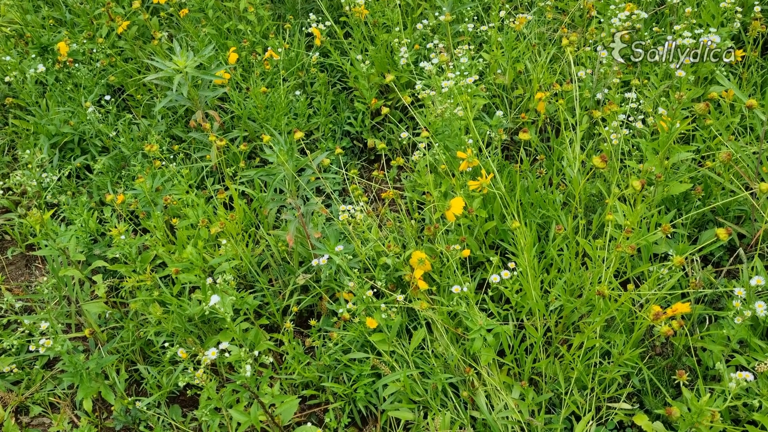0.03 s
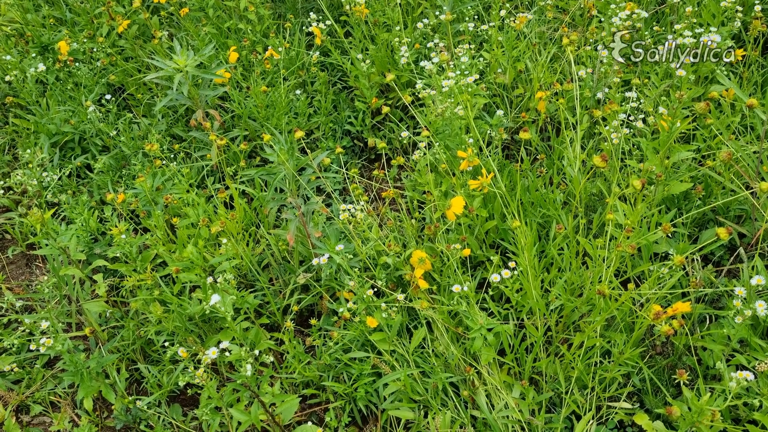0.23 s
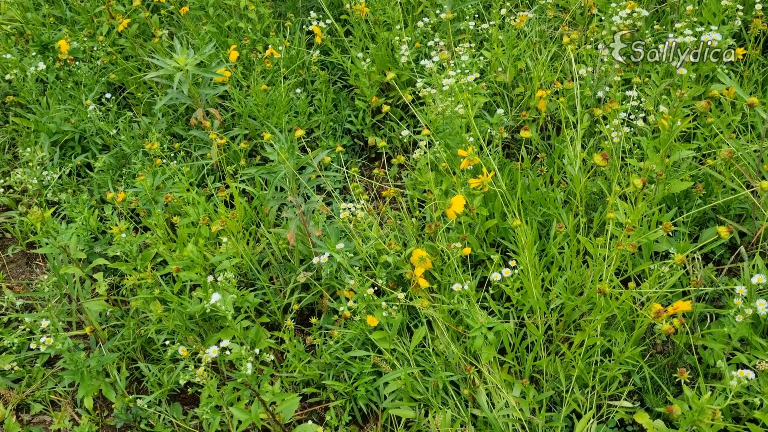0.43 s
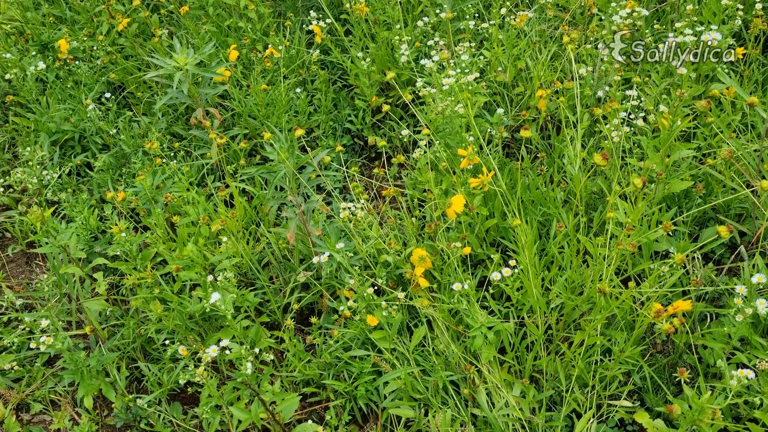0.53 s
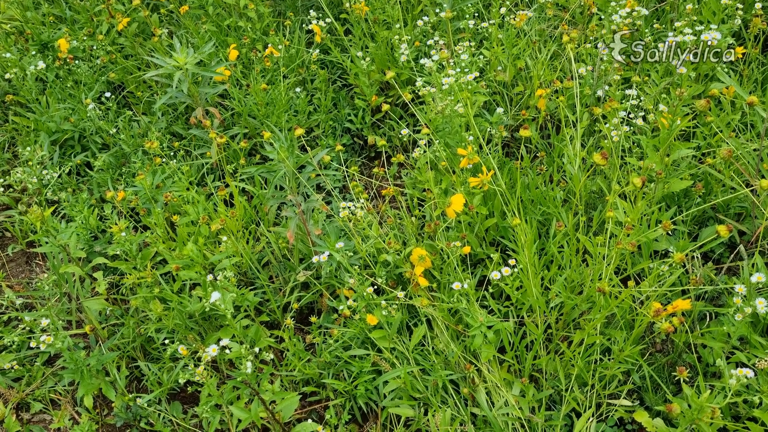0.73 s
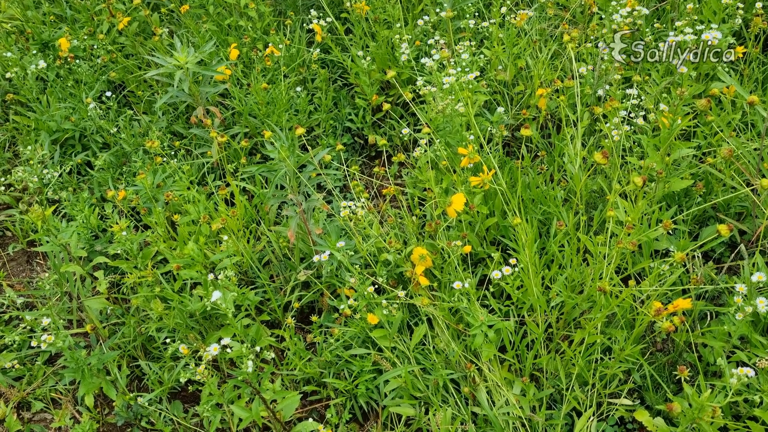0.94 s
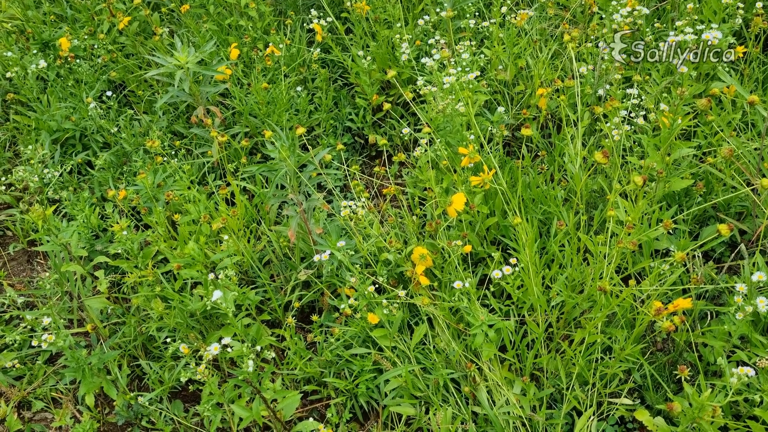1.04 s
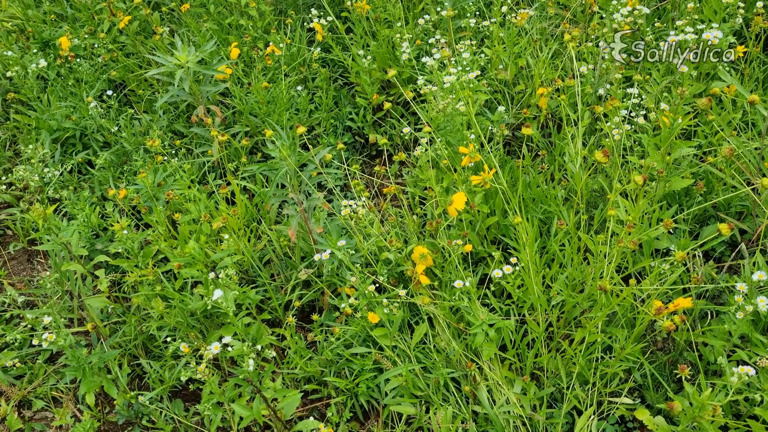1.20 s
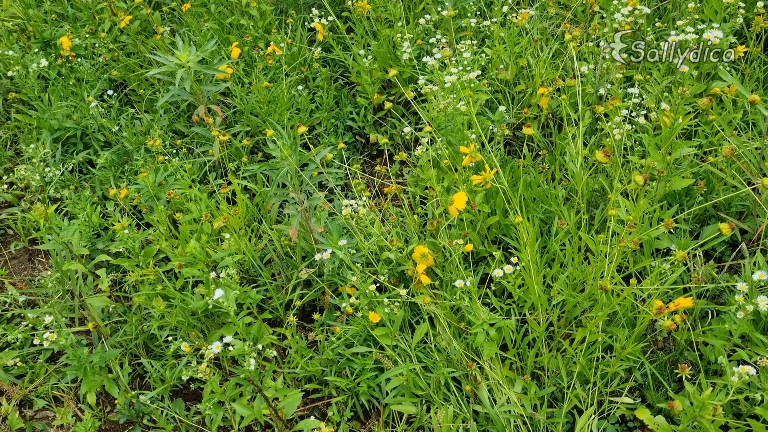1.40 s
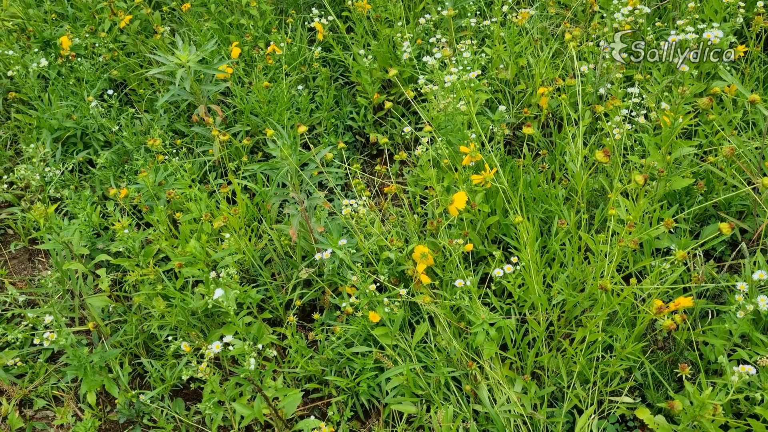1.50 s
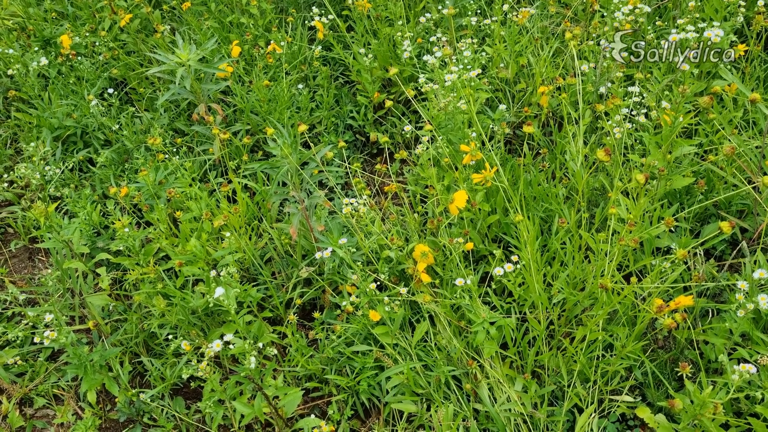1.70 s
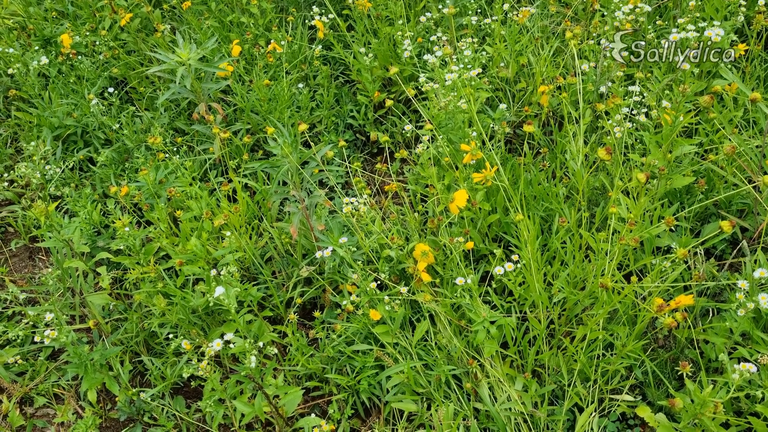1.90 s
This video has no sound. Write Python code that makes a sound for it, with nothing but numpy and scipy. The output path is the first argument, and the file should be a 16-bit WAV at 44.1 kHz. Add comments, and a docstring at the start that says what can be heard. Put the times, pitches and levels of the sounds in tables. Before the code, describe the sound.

Nearby frogs croak in quick turns, one humming, one bright and one lower, sometimes overlapping before the low one finishes alone. Faint raspy chirps, high insect hiss and soft wind fill the open marsh around them.

```python
"""Three frogs in a grassy wetland

A humming, a bright and a low frog croak close by, a little to the left. Each croak is a train of
throat pulses that rings the vocal sac; overlapping croaks beat and rasp against each other.
Behind them are a low wind rumble, the hush of the marsh, hissing insects and faint raspy chirps."""
import sys
import numpy as np
from scipy import signal
from scipy.fft import rfft, irfft
from scipy.io import wavfile
from scipy.ndimage import uniform_filter1d, minimum_filter1d

SR = 44100
rng = np.random.default_rng(int(sys.argv[2]) if len(sys.argv) > 2 else 0)


def dump(signal):
    """Clip the signal to [-1, 1] and save it as 16-bit WAV at the path in sys.argv[1]."""
    limited = np.clip(np.atleast_2d(signal).T, -1, 1)
    pcm = np.round(limited * 32767).astype(np.int16)
    wavfile.write(sys.argv[1], SR, pcm)


N = 85995
T = np.arange(N) / SR
FREQS = np.fft.rfftfreq(N, 1 / SR)


def undb(db):
    """Decibels to gain."""
    return 10 ** (np.asarray(db) / 20)


def unit(x):
    """Scale to rms 1."""
    return x / np.sqrt(np.mean(x ** 2) + 1e-18)


def curve(rows):
    """Columns of a time table at every sample."""
    times, *columns = np.array(rows, float).T
    return [np.interp(T, times, column) for column in columns]


def spectrum(rows):
    """Columns of a frequency table at every bin."""
    hz, *columns = np.array(rows, float).T
    return [np.interp(np.log(FREQS + 1), np.log(hz), column) for column in columns]


def shape(x, gain):
    """Filter by a gain per bin."""
    return irfft(rfft(x) * gain, N)


def noise(gain, correlation, pan_db):
    """Coloured stereo noise, rms 1; positive pan is left."""
    mid, side = (unit(shape(rng.standard_normal(N), gain)) for _ in range(2))
    sign = np.array([[1], [-1]])
    pair = np.sqrt(1 + correlation) * mid + np.sqrt(1 - correlation) * side * sign
    return unit(pair * undb(sign * pan_db / 2))


def flutter(rate_hz):
    """Smooth random fluctuation, rms 1."""
    return unit(shape(rng.standard_normal(N), np.exp(-(FREQS / rate_hz) ** 2) * (FREQS > 0)))


def swell(centre_s, half_s):
    """Raised-cosine rise and fall."""
    return np.cos(np.pi / 2 * np.clip((T - centre_s) / half_s, -1, 1)) ** 2


# Rumble spectrum (frequency [Hz], relative level [dB])
WIND_SPECTRUM = [(20, -12.5), (35, -25), (48, 4), (65, 3.5), (82, 2.5), (100, 4.5), (145, 2), (165, -5.5),
                 (190, -33), (400, -49)]
# Gusts (time [s], level [dB])
WIND_LEVEL = [(0, -37.5), (.5, -34.5), (1.08, -36.5), (1.2, -39.5), (1.42, -40.5), (1.55, -37.5),
              (1.95, -39)]


def wind():
    """Low wind rumble, nearly alike in both ears."""
    rumble = noise(undb(spectrum(WIND_SPECTRUM)[0]), correlation=.95, pan_db=1)
    return rumble * undb(curve(WIND_LEVEL)[0])


# Hush spectrum (frequency [Hz], relative level [dB])
MARSH_SPECTRUM = [(30, -44.5), (200, 5), (330, 1), (480, 2), (620, -0.5), (800, 4), (1000, -7), (1900, -6),
                  (2900, -6.5), (4200, -10.5), (5600, -16.5), (7600, -17.5), (8800, -29), (10300, -43.5),
                  (15000, -22)]
# Hush envelope (time [s], level [dB])
MARSH_LEVEL = [(0, -43.5), (.6, -42), (1.05, -41.5), (1.4, -43.5), (1.7, -44.5), (1.9, -47)]


def marsh():
    """Wide, even hush of the far wetland."""
    hush = noise(undb(spectrum(MARSH_SPECTRUM)[0]), correlation=.16, pan_db=2)
    return hush * undb(curve(MARSH_LEVEL)[0])


# Insect envelopes before flutter (time [s], rasp [dB], hiss [dB])
INSECT_LEVELS = [(0, -58, -60.5), (.25, -52.5, -59), (.6, -57, -57), (.85, -52.5, -56.5),
                 (1.03, -47.5, -52), (1.2, -53, -56), (1.45, -55, -59), (1.75, -57.5, -58),
                 (1.87, -53.5, -57), (1.95, -55.5, -62)]
# Insect hiss (frequency [Hz], relative level [dB])
HISS_SPECTRUM = [(9500, -36), (11000, -12), (12500, -4), (13700, -3), (16000, -11)]


def insects():
    """A fluttering rasp on the left, a pulsing high hiss on the right."""
    rasp_db, hiss_db = curve(INSECT_LEVELS)
    centre_hz, half_width_hz = 7100, 480
    rasp = noise(1 / (1 + ((FREQS - centre_hz) / half_width_hz) ** 2), correlation=.032, pan_db=9)
    hiss_band = undb(spectrum(HISS_SPECTRUM)[0]) * (FREQS > HISS_SPECTRUM[0][0])
    hiss = noise(hiss_band, correlation=-.26, pan_db=-5.5)
    return rasp * undb(rasp_db + .78 * flutter(130)) + hiss * undb(hiss_db + 2.7 * flutter(45))


# Chirps; from and to lie at half amplitude
# (centre [s], half length [s], from [Hz], to [Hz], bandwidth [Hz], level [dB], pan left [dB])
CHIRP_CALLS = [(0.062, 0.27, 2700, 3003, 400, -46.5, 3), (0.174, 0.049, 3900, 4800, 1700, -41.5, 7),
               (0.254, 0.064, 4700, 5380, 2600, -40, 5), (0.539, 0.044, 3360, 4750, 900, -51, 18),
               (1.021, 0.15, 2830, 2955, 408, -47, 4), (1.083, 0.092, 3045, 4787, 1400, -44.5, 8),
               (1.465, 0.089, 2890, 3090, 513.4, -43.5, 11), (1.544, 0.051, 3320, 4600, 1290, -45.5, 10),
               (1.734, 0.097, 3053, 3190, 600, -43, 9), (1.945, 0.031, 3100, 3190, 505.8, -45, 13)]


def chirps():
    """Distant raspy chirps: a noise band swells, glides up and fades."""
    out = np.zeros((2, N))
    for centre_s, half_s, from_hz, to_hz, width_hz, db, pan_db in CHIRP_CALLS:
        glide = np.clip((T - centre_s) / half_s, -1, 1) + .5
        hz = from_hz + (to_hz - from_hz) * glide
        carrier = np.sin(2 * np.pi * np.cumsum(hz) / SR)
        rasp = noise(1 / (1 + (2 * FREQS / width_hz) ** 2), correlation=.14, pan_db=pan_db)
        out += undb(db) * swell(centre_s, half_s) * unit(carrier * rasp)
    return out


def roughness(croaks, edge_rough):
    """A throat rattles as a croak starts and stops, but not on a second push within it."""
    steady_rough, edge_s = .08, .045
    spans = [(start, end) for start, _, _, end, *_ in croaks]
    edges = [at for span in spans for at in span if not any(start < at < end for start, end in spans)]
    return np.clip(steady_rough + edge_rough * sum(swell(at, edge_s) for at in edges), 0, 1)


def throat(cycles, hz, rough):
    """A click and a puff of air per cycle; roughness makes clicks uneven and puffs stronger."""
    jitter_cycles, scatter_db, alternate_db, breath = .05, 6, 3, .4  # at roughness 1
    puff_cycles = .45
    puffs = unit(np.exp(-(cycles % 1) / puff_cycles) * rng.standard_normal(N))
    at = np.interp(np.arange(1, int(cycles[-1])), cycles, np.arange(N))
    time_draw, size_draw = rng.standard_normal((N // 100, 2))[:len(at)].T
    click_rough, click_hz = rough[at.astype(int)], hz[at.astype(int)]
    strong_weak = (-1) ** np.arange(len(at))
    size = undb(click_rough * (scatter_db * np.tanh(size_draw) + alternate_db * strong_weak))
    at += jitter_cycles * click_rough * time_draw * SR / click_hz
    taps = at.astype(int)[:, None] + np.arange(-7, 9)
    offset = taps - at[:, None]
    clicks = np.sinc(offset) * np.sinc(offset / 8) * size[:, None]  # band-limited
    train = unit(np.bincount(np.clip(taps, 0, N - 1).ravel(), clicks.ravel(), N))
    return train + breath * rough * puffs


def vocal_sac(pulses, resonances):
    """Pulses ring the sac, a minimum-phase resonator."""
    cepstrum = irfft(np.log(undb(spectrum(resonances)[0])), N)
    causal = cepstrum * 2 * (np.arange(N) < N // 2)
    return shape(pulses, np.exp(rfft(causal)))


def croak_gains(croaks):
    """Bass, body, treble, hum gains: a soft lead-in swells, brightens and stops short; the hum arches."""
    attack_s, release_s = .03, .028
    bass_power, treble_power, hum_floor = .42, 2, .28
    gains = np.zeros((4, N))
    for start, rise, rise_s, end, body_db, lead_db, hum_db, crest, half_s, treble_db in croaks:
        attack = np.clip((T - start) / attack_s, 0, 1)
        release = 1 - np.exp(-np.maximum(end - T, 0) / release_s)
        push = .5 + .5 * np.tanh((T - rise) / (2 * rise_s))
        effort = undb(lead_db) + (1 - undb(lead_db)) * push
        bass = undb(body_db) * effort ** bass_power
        body = undb(body_db) * effort
        treble = undb(treble_db) * effort ** treble_power
        hum = undb(hum_db) * np.maximum(np.sqrt(swell(crest, half_s)), hum_floor)
        gains += attack * release * np.array([bass, body, treble, hum])
    return gains


def steady(x):
    """Even out the level over a few pulses."""
    window = SR // 70
    power = uniform_filter1d(uniform_filter1d(x ** 2, window), window)
    return x / np.sqrt(np.abs(power) + 1e-12)


def frog(croaks, pitch, sac, right_ear, bass_db, edge_rough):
    """The ringing sac in three bands, plus a pure hum an octave above the pulse rate."""
    hz = curve(pitch)[0]
    cycles = np.cumsum(hz) / SR
    ring = vocal_sac(throat(cycles, hz, roughness(croaks, edge_rough)), sac)
    below_bass, below_treble = (1 / (1 + (FREQS / split_hz) ** 20) for split_hz in (1400, 2467))
    bass, body, treble, hum = croak_gains(croaks)
    left = (undb(bass_db) * bass * steady(shape(ring, below_bass))
            + body * steady(shape(ring, below_treble - below_bass))
            + treble * steady(shape(ring, 1 - below_treble))
            + hum * unit(np.sin(2 * np.pi * 2 * cycles)))
    right_db, lead_rad = spectrum(right_ear)
    right = shape(left, undb(right_db) * np.exp(1j * lead_rad))
    return np.array([left, right])


# Croaks (start [s], rise centre [s], rise time constant [s], end [s], body [dB], lead-in re body [dB],
#         hum [dB], hum crest [s], hum half length [s], treble [dB])
HUMMING_CALLS = [(.115, .226, 0.0089, 0.37, -13.5, -25, -27, 0.28, 0.21, -32.5),
                 (.665, .715, .012, 0.83, -17.5, -14, -38.5, .76, .07, -56.5),
                 (1.08, 1.19, .025, 1.342, -14, -19.5, -24, 1.224, 0.12, -25)]
# Throat pulses (time [s], rate [Hz])
HUMMING_RATE = [(0.199, 216.6), (0.221, 224.8), (0.272, 228), (0.322, 234.1), (0.339, 242), (.69, 215),
                (.75, 226), (.8, 236.2), (1.09, 213.9), (1.14, 222.7), (1.25, 224.5), (1.3, 231.7),
                (1.328, 253.6)]
# Sac response (frequency [Hz], relative gain [dB])
HUMMING_RESONANCES = [(300, -52), (680, -19), (1133, -11), (1585, -3.5), (1811, -0.5), (2040, 5),
                      (2260, -10), (2490, -16), (3000, -47.5), (3550, -41.5), (4050, -59.5), (12000, -83.5)]
# Right ear re left (frequency [Hz], gain [dB], phase lead [rad])
HUMMING_RIGHT_EAR = [(470, -1, 1.77), (680, 6.5, 1.64), (895, 0, 2.19), (1570, -2.5, 2.54),
                     (1770, -5, 2.74), (2040, -14, 2.9), (2490, -16, 6.4), (3140, 0, 6)]


def humming_frog():
    """Strongest hum and rattle; the sac peaks near 2040 Hz."""
    return frog(HUMMING_CALLS, HUMMING_RATE, HUMMING_RESONANCES, HUMMING_RIGHT_EAR,
                bass_db=-11.5, edge_rough=.7)


# Bright frog: tables and columns as for the humming frog
BRIGHT_CALLS = [(.29, .318, 0.01, 0.51, -12.5, -35, -43.5, 0.48, 0.076, -29),
                (1.085, 1.153, 0.015, 1.235, -12.5, -18, -34, 1.19, .06, -24.5),
                (1.19, 1.249, .005, 1.3465, -13, -7.5, -46.5, 1.3, 0.098, -31)]
BRIGHT_RATE = [(.3, 239), (.35, 216), (.379, 208), (0.394, 213.5), (0.458, 220), (.48, 216), (1.075, 217),
               (1.105, 230), (1.141, 236), (1.193, 208), (1.219, 223), (1.245, 224), (1.27, 221),
               (1.334, 229)]
BRIGHT_RESONANCES = [(300, -44.5), (645, -22), (1070, -18.5), (1504, -8.5), (1720, -1), (1960, 4.5),
                     (2150, -0.5), (2360, -13), (2790, -17.5), (3000, -26), (3600, -31), (4050, -53.5),
                     (12000, -89.5)]
BRIGHT_RIGHT_EAR = [(690, 4, 1.4), (1330, 0, 2.03), (1750, 0, 2.29), (1980, -8.5, 3.15), (2550, -16, 5),
                    (2820, -6, 6.2)]


def bright_frog():
    """More treble, little hum; the last croak has a second push."""
    return frog(BRIGHT_CALLS, BRIGHT_RATE, BRIGHT_RESONANCES, BRIGHT_RIGHT_EAR,
                bass_db=-15, edge_rough=.6)


# Blips (centre [s], half length [s], pitch [Hz], level [dB])
BLIP_TONES = [(.497, 0.016, 548, -36.5), (0.658, 0.032, 536, -42.5), (0.918, 0.095, 437, -47),
              (1.337, 0.024, 452, -35.5), (1.74, 0.06, 432, -48.5)]


def blips():
    """Soft low blips and after-rings at the edges of croaks."""
    return sum(undb(db) * swell(centre_s, half_s) * unit(np.sin(2 * np.pi * hz * T))
               for centre_s, half_s, hz, db in BLIP_TONES)


# Low frog: tables and columns as for the humming frog
LOW_CALLS = [(.625, .735, 0.026, 0.89, -10, -42, -32.5, 0.83, 0.17, -36),
             (1.465, 1.566, 0.022, 1.7192, -13, -45.5, -36, 1.638, 0.15, -38.5)]
LOW_RATE = [(.64, 206.5), (0.699, 216.3), (0.778, 212.7), (0.831, 220), (0.878, 226.5), (1.499, 212),
            (1.554, 214.6), (1.621, 215), (1.669, 219.6), (1.71, 225.6)]
LOW_RESONANCES = [(300, -90.5), (480, -28), (630, -20), (1080, -17), (1300, -13.5), (1520, -6), (1735, 4),
                  (1940, -5), (2150, -22), (2380, -14.5), (2600, -20), (3000, -26), (3400, -40.5),
                  (4600, -50.5), (11000, -83)]
LOW_RIGHT_EAR = [(440, 1, 0.2), (1130, -1.5, 0.5), (1440, -3, 0.9), (1770, -7.5, 1.56), (2070, -5.5, 1.98),
                 (2730, -1.5, 2.3), (4050, -10.5, 2.7)]


def low_frog():
    """Smoothest throat; the sac peaks near 1735 Hz."""
    return frog(LOW_CALLS, LOW_RATE, LOW_RESONANCES, LOW_RIGHT_EAR, bass_db=-13, edge_rough=.3)


def plant_scatter(x, t60_s=.28, level_db=-24):
    """Faint, short scatter from the plants around."""
    tail = rng.standard_normal((2, SR // 2)) * undb(-60 * T[:SR // 2] / t60_s)
    tail /= np.sqrt(np.sum(tail ** 2, axis=1, keepdims=True))
    return undb(level_db) * signal.fftconvolve(x, tail, axes=1)[:, :N]


def scene():
    """Three frogs in front of the wetland; overlapping pulse trains beat."""
    frogs = humming_frog() + bright_frog() + low_frog()
    return frogs + plant_scatter(frogs) + blips() + chirps() + insects() + wind() + marsh()


def record(dry):
    """Peak limiter, then a steep low-pass."""
    ceiling, smooth_s, cutoff_hz = .92, .002, 15800
    window = int(smooth_s * SR)
    gain = ceiling / np.maximum(np.abs(dry).max(axis=0), ceiling)
    gain = uniform_filter1d(minimum_filter1d(gain, 2 * window), window)
    lowpass = signal.ellip(10, .2, 80, cutoff_hz, fs=SR, output="sos")
    return signal.sosfilt(lowpass, dry * gain)


dry = scene()
out = record(dry)
dump(out)
```